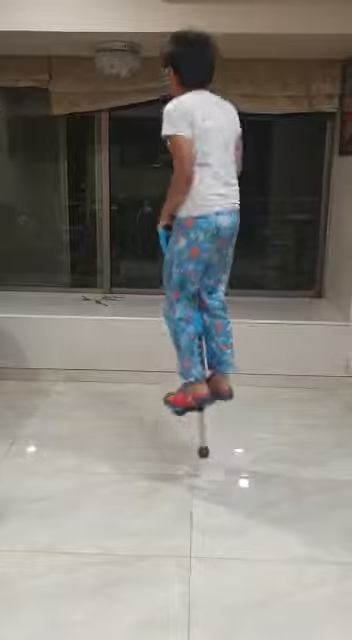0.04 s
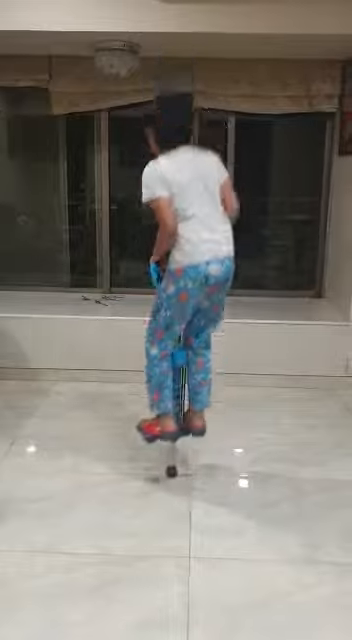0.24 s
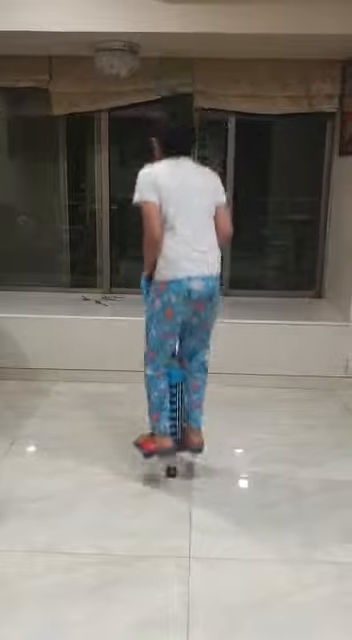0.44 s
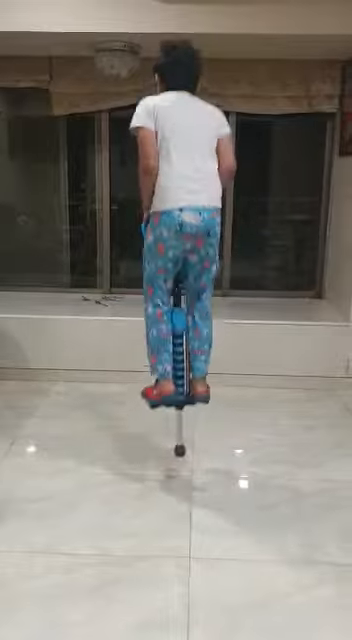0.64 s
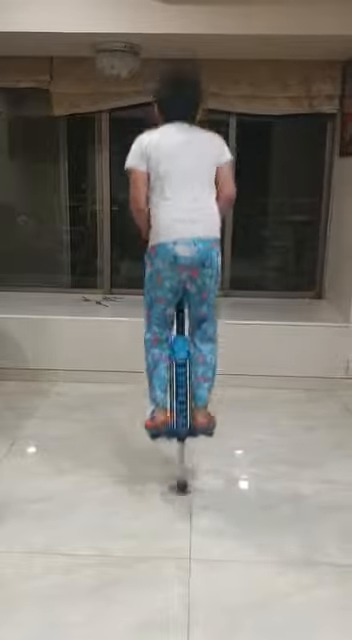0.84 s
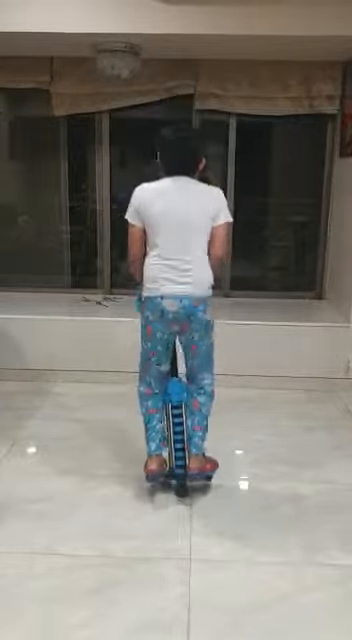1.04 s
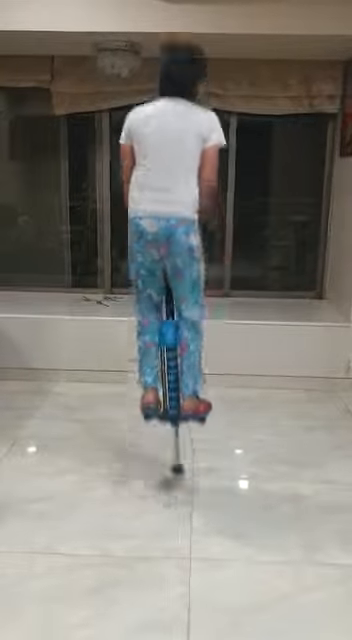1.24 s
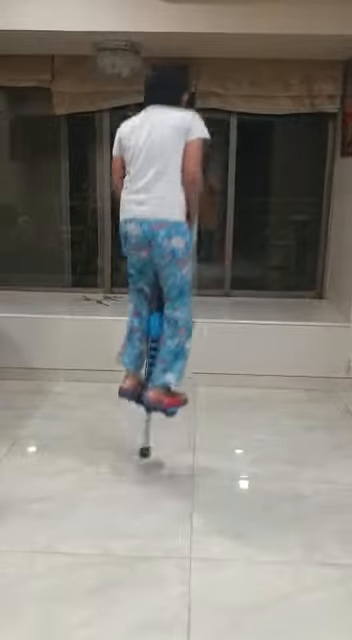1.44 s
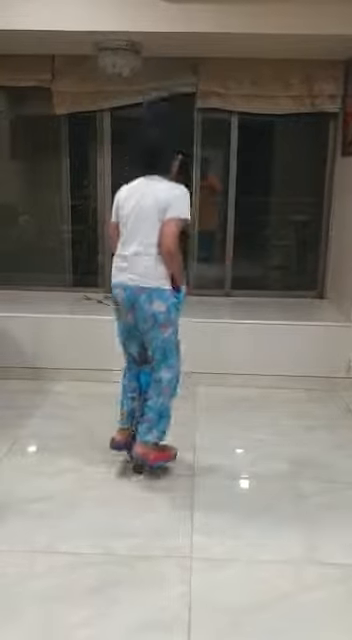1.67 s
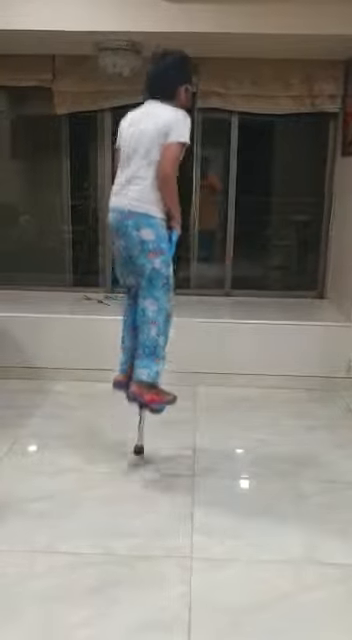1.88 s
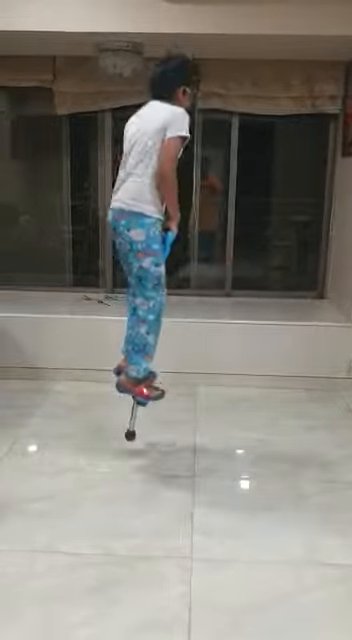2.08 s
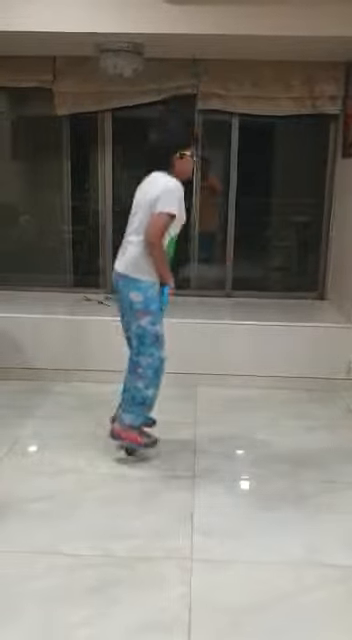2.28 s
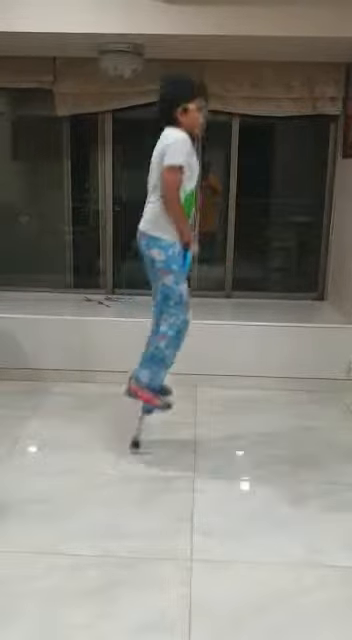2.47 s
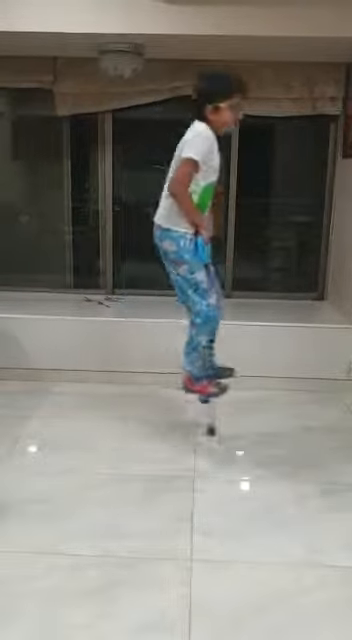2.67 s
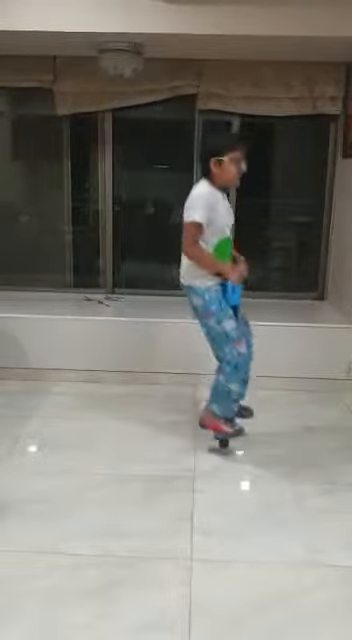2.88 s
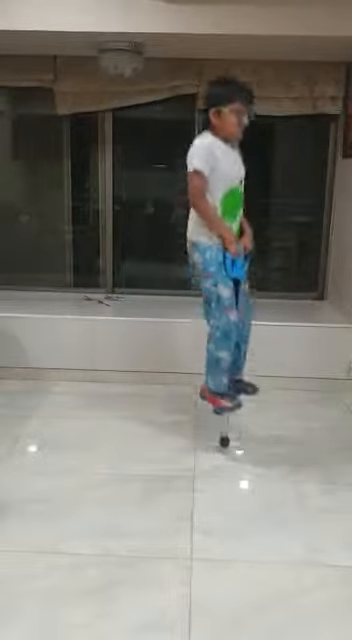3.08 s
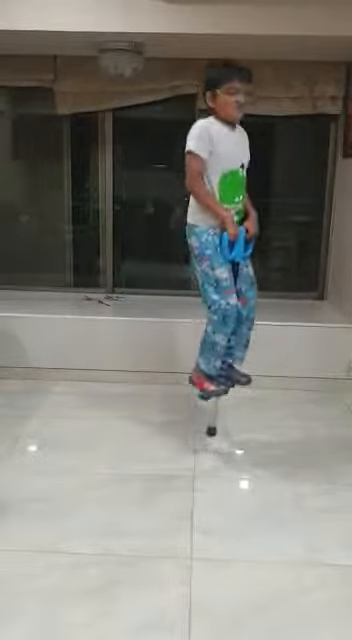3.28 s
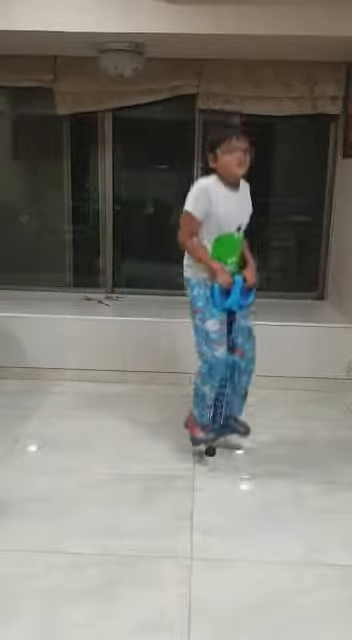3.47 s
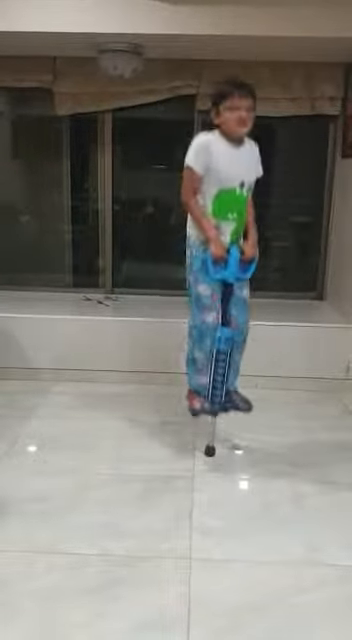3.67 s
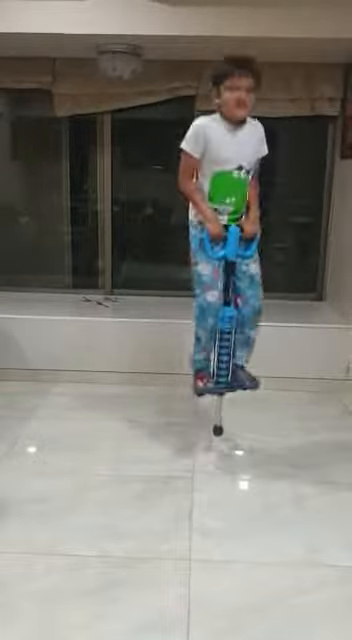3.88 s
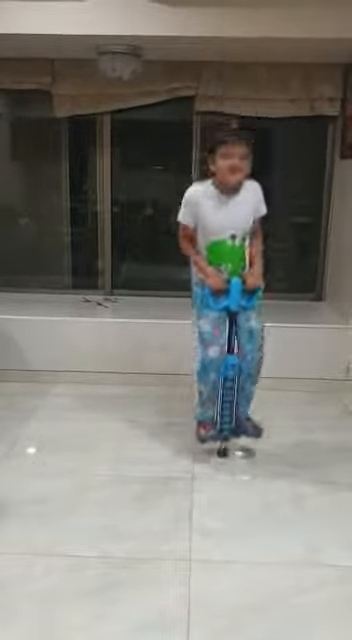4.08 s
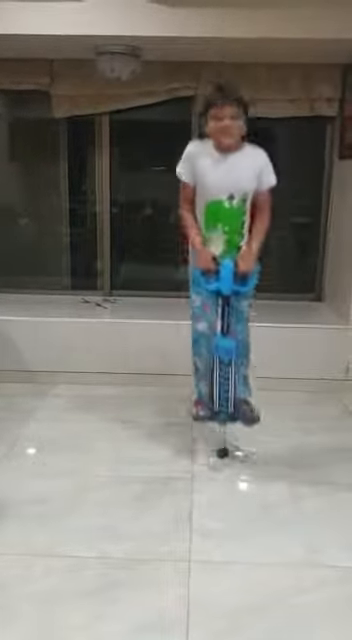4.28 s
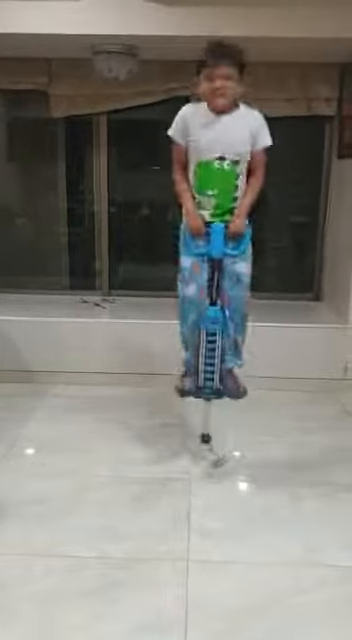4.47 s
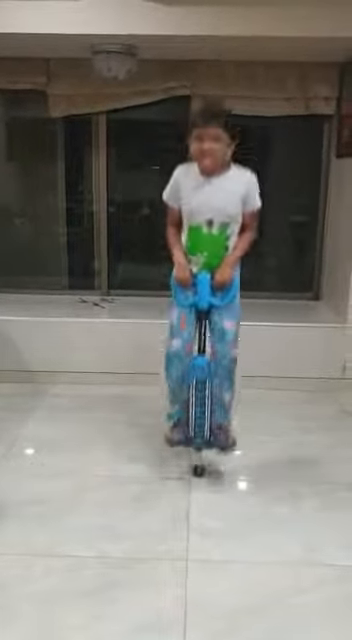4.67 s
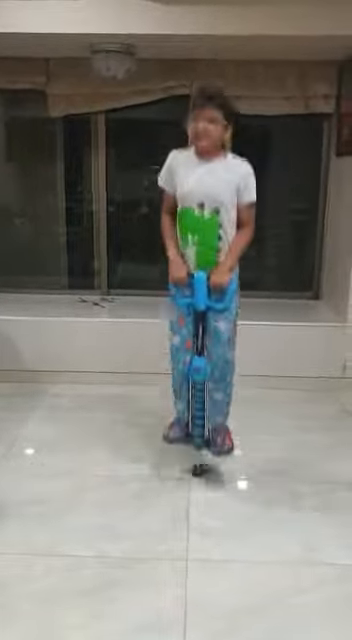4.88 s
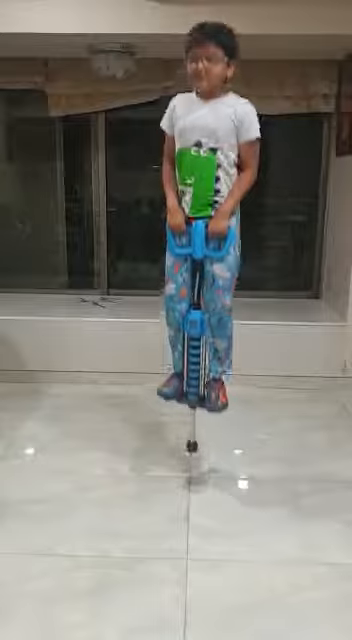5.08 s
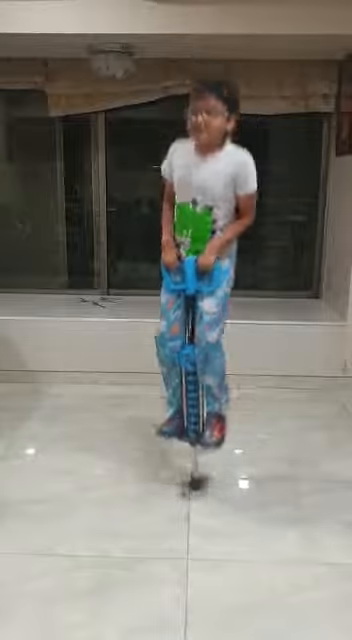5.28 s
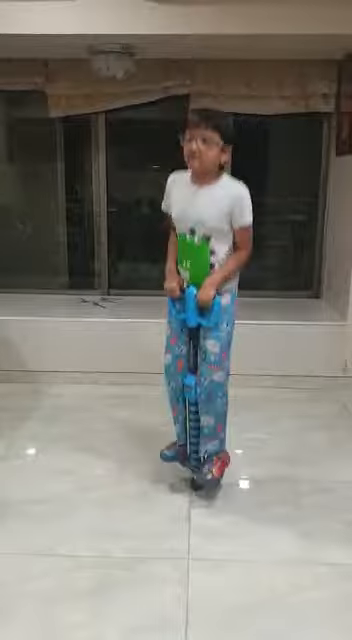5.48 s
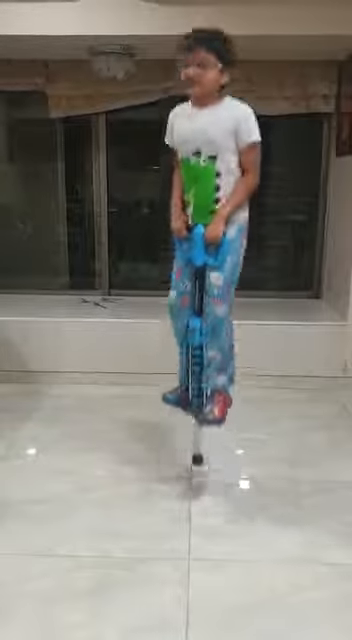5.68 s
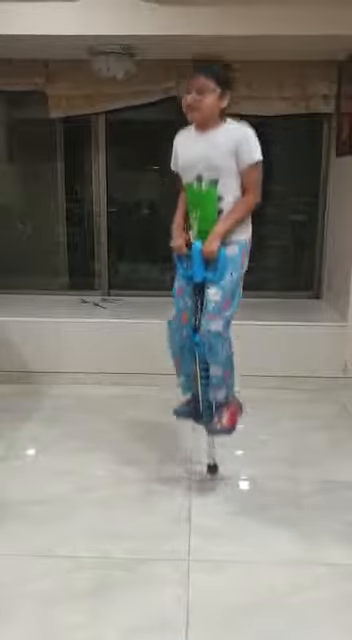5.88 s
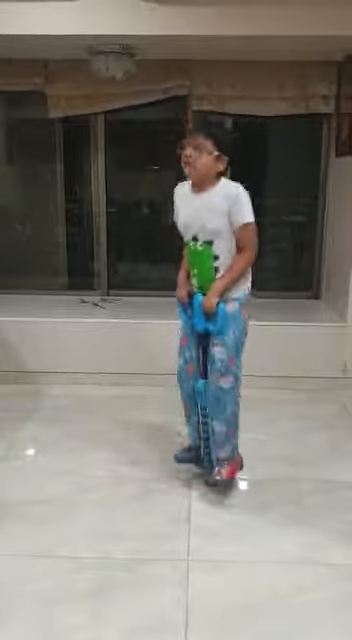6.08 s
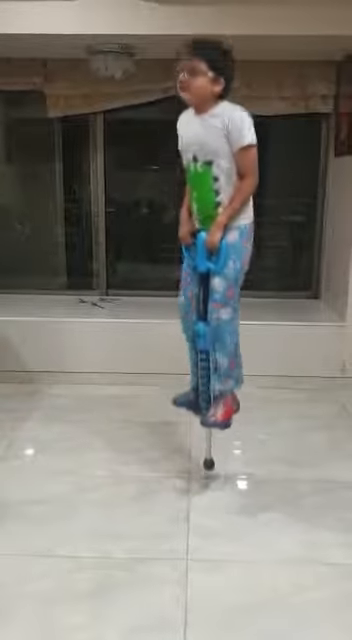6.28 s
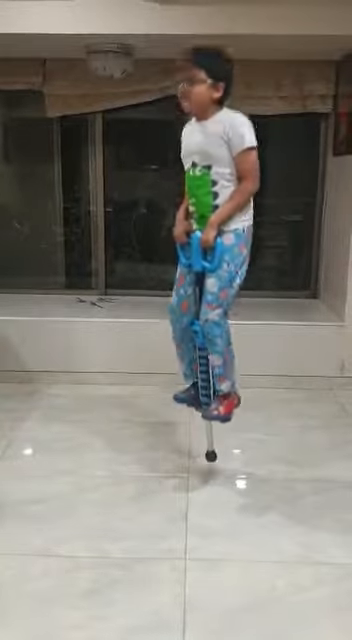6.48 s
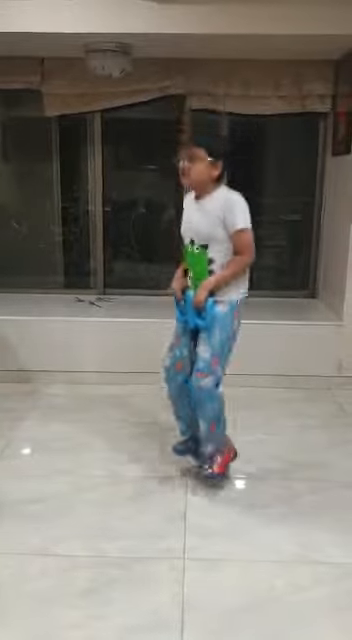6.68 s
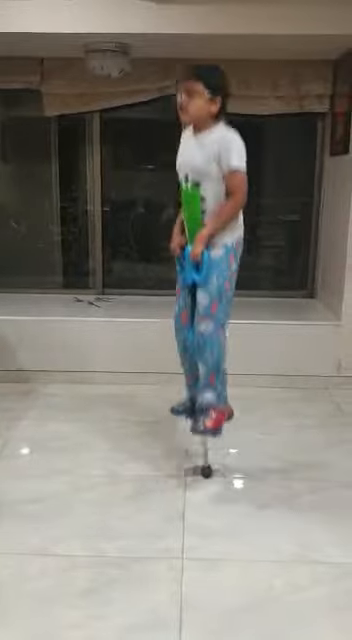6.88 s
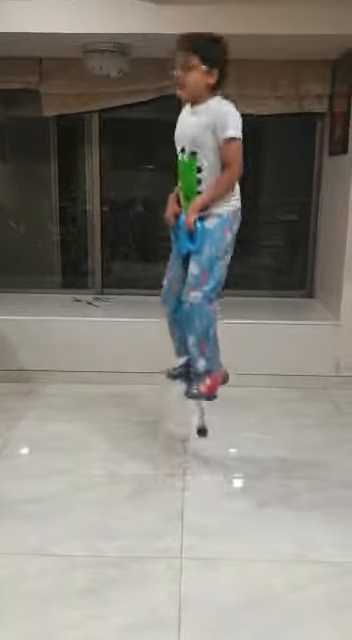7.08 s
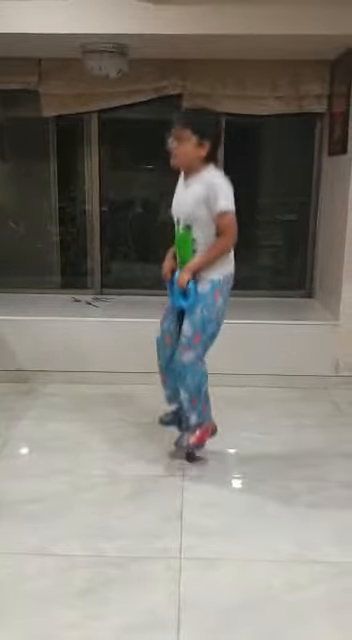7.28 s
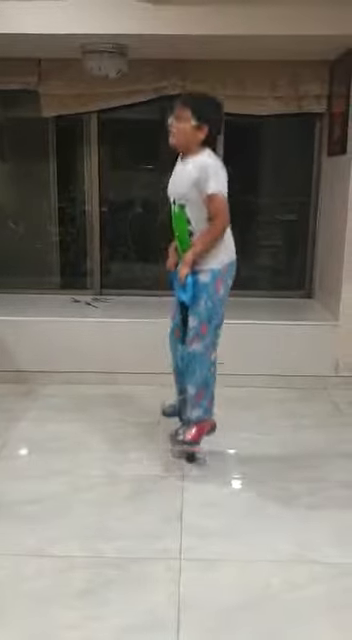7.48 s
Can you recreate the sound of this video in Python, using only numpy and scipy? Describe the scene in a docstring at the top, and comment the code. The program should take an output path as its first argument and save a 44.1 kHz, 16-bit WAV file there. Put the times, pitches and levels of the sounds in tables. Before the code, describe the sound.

Regular pogo stick hops on tile: dull thud with metal tick, rough scrape and groaning coils, then a louder ringing clack, echoing in a bare room.

```python
"""The fading ring of a metal blow is heard first, over faint room noise; then a pogo stick bounces on,
about one and a half times a second, in a bare, tiled living room.
Each landing gives a rubber thud of varying pitch, a swelling floor boom and a tick of loose metal.
Random slips make the shaft scrape down and up and the spring groan; gliding harmonics make the coils creak.
The shaft then slams into its end stop and damped modes ring its tube; diffuse decaying noise is the hard room."""
import sys
import numpy as np
from scipy import signal
from scipy.fft import rfft, irfft, next_fast_len
from scipy.io import wavfile

SR = 44100
rng = np.random.default_rng(int(sys.argv[2]) if len(sys.argv) > 2 else 0)


def put_to_file(sound):
    """Save the sound as 16-bit audio at rate SR, in the file named by the first command-line argument."""
    columns = np.atleast_2d(sound).T  # one column per channel
    safe = np.clip(columns, -1, 1)
    whole_steps = np.round(safe * 32767)
    wavfile.write(sys.argv[1], SR, whole_steps.astype(np.int16))


N = 332514

# Bounces: landing t/s, end stop t/s, landing force level/dB, rebound force level/dB, thud pitch f/Hz;
# a force of 0 dB is a usual bounce
BOUNCES = [(-0.38, -0.065, 0, 1.5, 400), (0.268, 0.5788, -0.1, 0.5, 420), (0.911, 1.2369, 1, 2, 443),
           (1.57, 1.8747, 1.5, 0, 410), (2.2036, 2.5133, -2, 0.5, 345), (2.796, 3.129, -1.7, -3.7, 372),
           (3.4078, 3.7304, -1.5, -3, 382), (4.032, 4.3466, 2, 0.9, 360), (4.6708, 4.984, 0.5, 1.2, 366),
           (5.325, 5.63, 2, -0.2, 390), (5.9612, 6.26, 3, 1, 390), (6.593, 6.9195, -2.3, 0, 368),
           (7.2579, 7.573, -1.7, -3, 413)]
# Dull knocks of the frame when the spring is deeply pressed: t/s, level/dB
KNOCKS = [(.408, -33), (1.05, -38), (1.704, -33), (4.151, -36.5), (4.79, -35.5), (5.449, -31), (6.088, -34),
          (6.747, -37.5)]

# How each part follows the force: level/dB in a usual bounce, slope/(dB per dB of force)
THUD_LEVEL = (-27.5, 0.38)
BOOM_LEVEL = (-45, .8)
TICK_LEVEL = (-24, 1.2)
DOWN_LEVEL = (-31.5, 0.33)
GROAN_LEVEL = (-38.5, .3)
CREAK_LEVEL = (-30.5, 0.18)
UP_LEVEL = (-23.5, 0.76)
CLANK_LEVEL = (-19, 0.38)
EDGE_LEVEL = (-22.6, 1)
TICK_SNAP_LEVEL = (-11.5, 1.8)
EDGE_SNAP_LEVEL = (-12, 1.4)

# Phases of the stroke: centre/1, width/1, as shares of the time on the floor.
# The shaft slides in fast, slows against the spring, strains the coils, and slides out again
PLUNGE = (0.08, 0.16)
SQUEEZE = (.36, 0.086)
STRAIN = (0.29, 0.4)
RISE = (0.799, 0.091)

# Colours of the parts, of which only the shape counts: f/Hz, spectral level/dB
THUD_COLOUR = [(30, -32), (65, -10.5), (130, -2), (190, -10), (250, 1), (370, 5), (500, 2.5), (650, -3),
               (950, 1.5), (1500, -6), (4000, -22), (12000, -65)]
TICK_COLOUR = [(200, -28), (900, -6), (1500, -4), (2400, 5.5), (4200, 1.5), (6000, -0.5), (8700, -1),
               (11000, 2.5), (13500, 4.5), (16000, -7)]
SCRAPE_COLOUR = [(150, -27.5), (500, -4.5), (750, 2), (1500, -2.5), (2600, 0.8), (4400, -4), (5400, -9.5),
                 (7000, -9.5), (9000, -13), (12000, -12), (16000, -13.5)]
GROAN_COLOUR = [(60, -28), (150, -5.5), (260, 6), (430, 3.5), (620, 6), (900, -8), (1300, -11), (2500, -15),
                (8000, -52)]
CLANK_COLOUR = [(40, -16), (150, -8), (450, -7.5), (750, -6), (1000, 1), (1200, -2.5), (1650, -6.5),
                (2000, -1), (2550, 3), (3000, -4), (4700, -4), (7000, -9.5), (9000, -13.5), (16000, -25)]
EDGE_COLOUR = [(1000, -45), (5000, -27), (7000, -5), (8700, -7), (11200, 2), (13500, 0.5), (16000, -5.5)]
BOOM_COLOUR = [(20, -19), (42, -3.5), (72, 5), (105, -7), (150, -3), (300, -23), (2000, -75)]
KNOCK_COLOUR = [(30, -28), (70, -14), (150, 0), (240, -4), (400, -6.5), (900, -11.5), (1600, -16),
                (5000, -40), (9000, -22), (13000, -17), (16000, -20)]
SNAP_COLOUR = [(1000, -26), (3000, -20), (6000, -1), (9000, -16.5), (11000, 0), (13500, 5), (16000, -1.5)]
# Colour of the steady background noise: f/Hz, spectral level/dB
AIR_COLOUR = [(20, -1), (45, -7), (100, -1.5), (300, -6.5), (1000, -15), (3000, -18.5), (8000, -28),
              (16000, -53)]

# Modes of the steel tube and spring: f/Hz, relative level/dB, t60/s
TUBE_MODES = [(703, 3, 0.25), (900, 5, 0.17), (1056, 1, 0.18), (1412, -1, 0.12), (1904, 2, 0.13),
              (2244, 1, .06), (2380, 1, 0.12), (2453, 5.5, 0.24), (2580, -3, 0.2), (3140, 12.5, 0.076)]
# Standing waves of the room: f/Hz, level/dB, t60/s
ROOM_MODES = [(72.6, -56, 0.9), (150.7, -53.5, 0.29), (210.8, -55, 0.47), (244.4, -54, 0.23), (330, -61, 1)]
# Decay of the diffuse room sound: f/Hz, t60/s
DECAY = [(60, 0.68), (250, 0.52), (900, 0.73), (2500, 0.63), (5000, 0.63), (9000, 0.55), (15000, 0.34)]
# Left-right correlation of the diffuse room sound: f/Hz, correlation/1
LIKENESS = [(60, 0.9), (140, 0.87), (290, 0.92), (640, 0.18), (1400, 0), (15000, 0.016)]
# Difference between the two microphones: f/Hz, left minus right level/dB
TILT = [(60, 1), (200, -1.5), (380, -3.5), (700, -6.5), (1300, -4.5), (2400, -5.5), (5000, -8), (9500, -1),
        (13500, -5.5)]

THUD_HZ = 390   # the pitch at which THUD_COLOUR is given
PLUNGE_DB, COIL_CLICK_DB = 3.5, -12.5   # against the downward scrape
TUBE_DB = -14   # the tube's ring against the clank
TICK_DELAY_S, EDGE_DELAY_S = .0026, .0015   # metal meets metal after the landing, and after the end stop
AIR_DB = -49.5
LEAD_S, BOUNCE_S, TAIL_S = .5, .5, .9   # lead-in, dry length of a bounce, length of a room tail
CUTOFF_HZ = 15900
PATHS = 5   # separate ways from the stick into the room


def amp(db):
    """Level definition: gain is ten to the power of level/dB over twenty."""
    return 10 ** (np.asarray(db) / 20)


def level(part, force_db):
    """Linear law in decibels: the usual level/dB plus the part's share of the force."""
    usual_db, slope = part
    return usual_db + slope * force_db


def at_hz(points, hz):
    """Linear interpolation of a table on a logarithmic frequency axis."""
    f, value = np.transpose(points)
    return np.interp(np.log(np.maximum(hz, 1)), np.log(f), value)


def unit_energy(x):
    """Energy normalisation: the sum of squares becomes one."""
    return x / np.sqrt(np.sum(x ** 2, axis=-1, keepdims=True) + 1e-20)


def swell(x, centre, width):
    """Gaussian envelope: a smooth rise and fall."""
    return np.exp(-.5 * ((x - centre) / width) ** 2)


def drift(t, knots_per_s):
    """Random modulation: straight lines between normal random knots."""
    knots = rng.standard_normal(256)
    return np.interp((t - t[0]) * knots_per_s, np.arange(len(knots)), knots)


def body(force, colour, size=2048):
    """Minimum-phase filtering: a causal body of the given colour responds to each row of force."""
    log_gain = np.log(amp(at_hz(colour, np.fft.rfftfreq(size, 1 / SR))))
    # folding the cepstrum onto positive times makes the response causal
    cepstrum = irfft(log_gain)
    cepstrum[1:size // 2] *= 2
    cepstrum[size // 2 + 1:] = 0
    response = unit_energy(irfft(np.exp(rfft(cepstrum))))
    return signal.fftconvolve(force, response[None], axes=1)[:, :force.shape[1]]


def ringing(modes, t, vary_db):
    """Modal superposition: damped sines start at t = 0, each with a randomly varied strength."""
    t = np.maximum(t, 0)
    total = 0
    for hz, db, t60 in modes:
        envelope = amp(db + vary_db * rng.normal() - 60 * t / t60)
        total = total + envelope * np.sin(2 * np.pi * hz * t)
    return total


def blow(t, rebound_db, spread_s):
    """Impulsive excitation: a contact at t = 0 and fading rebounds, one per path; energy of 50 ms at level one."""
    delays = np.append(0, np.cumsum(spread_s * rng.uniform(.3, 1, PATHS - 1)))
    sizes = np.append(1, amp(rebound_db) * np.exp(-delays[1:] / (2 * spread_s)))
    force = np.zeros((PATHS, len(t)))
    samples = np.searchsorted(t[:-1], delays)
    force[np.arange(PATHS), samples] = unit_energy(sizes) * np.sqrt(SR / 20)
    return force


def friction(t, slips_per_s, uneven_db):
    """Stochastic excitation: uneven tiny slips at random moments, dealt to the paths; rms one in all."""
    slips = (rng.random(len(t)) < slips_per_s / SR) * rng.choice([-1, 1], len(t))
    sizes = amp(uneven_db * np.clip(rng.normal(size=len(t)), -2, 2))
    slips = unit_energy(slips * sizes) * np.sqrt(len(t))
    path = rng.integers(0, PATHS, len(t))
    return slips * (path == np.arange(PATHS)[:, None])


def room_air():
    """Filtered noise: steady room noise, one part shared and one for each side."""
    air = body(rng.standard_normal((3, N)), AIR_COLOUR)
    return amp(AIR_DB) * (air[0] + 0.22 * air[1:])


def room_tail(count=14):
    """Diffuse reverberation at one spot: bands of noise decay, the top treble fastest, with the bass alike."""
    size = int(TAIL_S * SR)
    t, hz = np.arange(size) / SR, np.fft.rfftfreq(size, 1 / SR)
    alike = np.clip(at_hz(LIKENESS, hz), -.99, .99)
    mid, side = rfft(rng.standard_normal((2, size)))
    echoes = np.sqrt(1 + alike) * mid + np.sqrt(1 - alike) * side * [[1], [-1]]
    centres = np.geomspace(60, 15000, count)
    tail = 0
    for centre, share in zip(centres, np.eye(count)):
        # overlapping bands, whose shares add up to one
        band = irfft(echoes * at_hz(np.c_[centres, share], hz), size)
        tail = tail + band * amp(-60 * t / at_hz(DECAY, centre))
    return unit_energy(tail) + ringing(ROOM_MODES, t, vary_db=1.0)


def in_room(x, tails, near_db, near_s, size=1024):
    """Convolution: each path excites its tail, led by sound scattered from the frame and nearby tiles."""
    echoes = tails.copy()
    fade = np.exp(-np.arange(size) / (near_s * SR))
    echoes[..., :size] += amp(near_db) * unit_energy(tails[..., size:2 * size] * fade)
    dry_paths = x[:, None].astype("float32")
    return signal.fftconvolve(dry_paths, echoes.astype("float32"), axes=2).sum(axis=0)


def frame_knocks(t, landing_s, stop_s):
    """Impulse response: blows while the spring is deeply pressed excite the dull frame."""
    sound = np.zeros((PATHS, len(t)))
    for knock_s, knock_db in KNOCKS:
        if landing_s < knock_s < stop_s:
            force = blow(t - knock_s, rebound_db=-14.0, spread_s=0.0041)
            sound += amp(knock_db) * body(force, KNOCK_COLOUR)
    return sound


def creak(t, contact_s, force_db, slack_hz=570, loaded_hz=900):
    """Stick-slip: the coils give wavering harmonic squeaks, higher the harder the spring is pressed."""
    load = np.sin(np.pi * np.clip(t / contact_s, 0, 1))
    hz = slack_hz + (loaded_hz - slack_hz) * load ** 2
    hz = hz * amp(1.2 * drift(t, knots_per_s=35))   # wavering pitch
    phase = 2 * np.pi * np.cumsum(hz) / SR
    grip = np.clip(drift(t, knots_per_s=55), 0, 1.2) * np.sqrt(load) * swell(t / contact_s, .52, .3)
    harmonics = np.sin(phase) + amp(-10) * np.sin(2 * phase) + amp(-9) * np.sin(3 * phase)
    squeak = amp(level(CREAK_LEVEL, force_db)) * grip * harmonics
    return np.eye(PATHS)[0][:, None] * squeak   # the first path only


def shaft(t, contact_s, landing_db, rebound_db):
    """Sliding friction: the shaft rubs down, rests at the turn and rubs up; loaded coils groan and click."""
    stroke = t / contact_s
    touching = (stroke > 0) & (stroke < 1)
    down = amp(PLUNGE_DB) * swell(stroke, *PLUNGE) + swell(stroke, *SQUEEZE)
    down = amp(level(DOWN_LEVEL, landing_db)) * down
    up = amp(level(UP_LEVEL, rebound_db)) * swell(stroke, *RISE)
    strain = amp(level(GROAN_LEVEL, landing_db)) * swell(stroke, *STRAIN)
    rubbing = touching * (down + up) * friction(t, slips_per_s=700, uneven_db=6.5)
    clicking = touching * down * friction(t, slips_per_s=70, uneven_db=11)
    groaning = touching * strain * friction(t, slips_per_s=140, uneven_db=3.5)
    scrape = body(rubbing, SCRAPE_COLOUR)
    coil_clicks = amp(COIL_CLICK_DB) * body(clicking, TICK_COLOUR)
    return scrape + coil_clicks + body(groaning, GROAN_COLOUR)


def snap(t, level_db, decay_s):
    """Direct radiation: metal chatter decays at once and comes straight to the microphones, mostly the right."""
    chatter = (t > 0) * np.exp(-np.abs(t) / decay_s) * rng.standard_normal((2, len(t)))
    return amp(level_db) * amp([[-6], [0]]) * body(chatter, SNAP_COLOUR)


def loose_metal(since_tick, since_edge, landing_db, rebound_db):
    """Repeated impact: loose metal rattles after the landing and clatters after the end stop."""
    rattle = blow(since_tick, rebound_db=-10, spread_s=.008)
    clatter = blow(since_edge, rebound_db=-5, spread_s=.005)
    tick = amp(level(TICK_LEVEL, landing_db)) * body(rattle, TICK_COLOUR)
    edge = amp(level(EDGE_LEVEL, rebound_db)) * body(clatter, EDGE_COLOUR)
    return tick + edge


def end_stop(t, force_db):
    """Modal excitation: the spring throws the shaft on its stop; the tube rings, damped by hands and feet."""
    force = blow(t, rebound_db=-3, spread_s=.006)
    modes = unit_energy(ringing(TUBE_MODES, t - t[0], vary_db=1.5))
    tube = signal.fftconvolve(force, modes[None], axes=1)[:, :len(t)]
    return amp(level(CLANK_LEVEL, force_db)) * (body(force, CLANK_COLOUR) + amp(TUBE_DB) * tube)


def landing(t, force_db, thud_hz):
    """Impact and loading: the rubber foot hits the tiles, then the floor booms under the rider's weight."""
    colour = np.array(THUD_COLOUR) * [thud_hz / THUD_HZ, 1]   # shifts the thud's pitch
    force = blow(t, rebound_db=-3, spread_s=.016)
    thud = amp(level(THUD_LEVEL, force_db)) * body(force, colour)
    load = (t > 0) * swell(t, .055, .035) * friction(t, slips_per_s=900, uneven_db=2)
    return thud + amp(level(BOOM_LEVEL, force_db)) * body(load, BOOM_COLOUR)


def bounce(t, tails, landing_s, stop_s, landing_db, rebound_db, thud_hz):
    """Superposition: one whole bounce, from landing to end stop, sums its parts in the room."""
    since, since_stop, contact_s = t - landing_s, t - stop_s, stop_s - landing_s
    dull = landing(since, landing_db, thud_hz) + frame_knocks(t, landing_s, stop_s)
    frame = shaft(since, contact_s, landing_db, rebound_db)
    frame = frame + creak(since, contact_s, landing_db) + end_stop(since_stop, rebound_db)
    # the rubber gives for a moment before the play in the metal parts closes
    since_tick, since_edge = since - TICK_DELAY_S, since_stop - EDGE_DELAY_S
    metal = loose_metal(since_tick, since_edge, landing_db, rebound_db)
    sound = in_room(dull + frame, tails, near_db=-12.0, near_s=0.0033)
    sound = sound + in_room(metal, tails, near_db=-26, near_s=0.002)
    sound[:, :len(t)] += snap(since_tick, level(TICK_SNAP_LEVEL, landing_db), decay_s=0.0013)
    sound[:, :len(t)] += snap(since_edge, level(EDGE_SNAP_LEVEL, rebound_db), decay_s=0.0019)
    return sound


def scene(count=16):
    """Superposition: all bounces over room noise; the stick moves about, so its paths keep changing."""
    lead, size = int(LEAD_S * SR), int(BOUNCE_S * SR)
    tails = np.array([room_tail() for spot in range(count)])
    out = np.zeros((2, lead + N + 2 * SR))
    for row in BOUNCES:
        start = int(row[0] * SR) - SR // 100   # 10 ms ahead of the landing
        t = (start + np.arange(size)) / SR
        spots = rng.permutation(count)[:PATHS]
        sound = bounce(t, tails[spots], *row)
        out[:, lead + start:lead + start + sound.shape[1]] += sound
    return out[:, lead:lead + N] + room_air()


def record(dry):
    """Linear filtering: the right microphone is louder above the bass; deep bass and top are cut steeply."""
    size = next_fast_len(N + SR // 10)
    hz = np.fft.rfftfreq(size, 1 / SR)
    sides = amp(at_hz(TILT, hz) * [[.5], [-.5]])
    sides = sides / np.sqrt(np.mean(sides ** 2, axis=0))   # keeps the mean power gain at one
    heard = irfft(rfft(dry, size) * sides, size)[:, :N]
    bass_cut = signal.butter(6, 36, "high", fs=SR, output="sos")
    top_cut = signal.ellip(10, .2, 70, CUTOFF_HZ, fs=SR, output="sos")
    heard = signal.sosfilt(bass_cut, heard)
    return signal.sosfilt(top_cut, np.clip(heard, -1, 1))


dry = scene()
out = record(dry)
put_to_file(out)
```